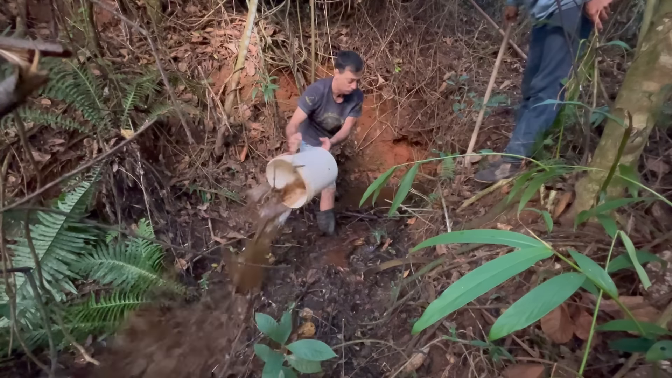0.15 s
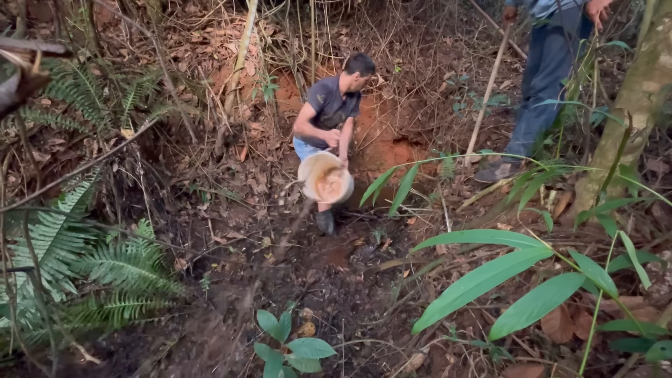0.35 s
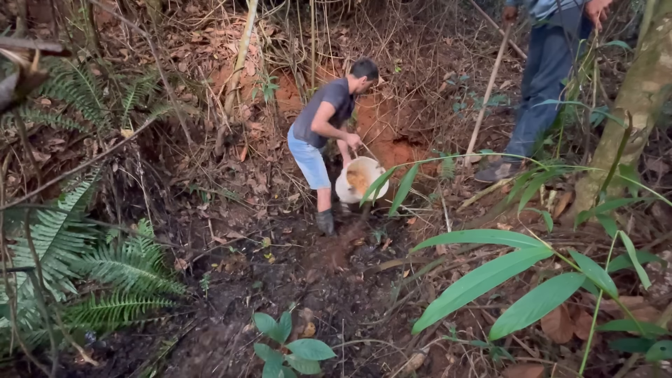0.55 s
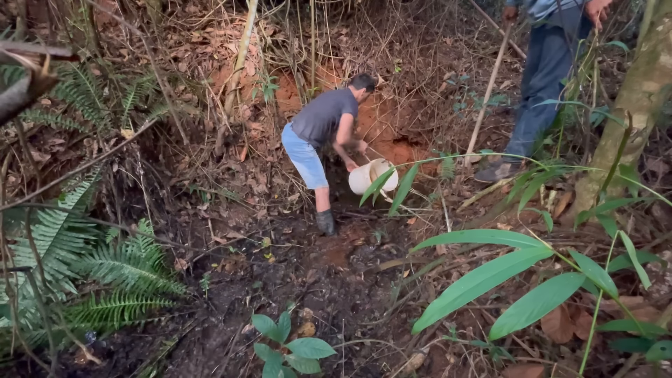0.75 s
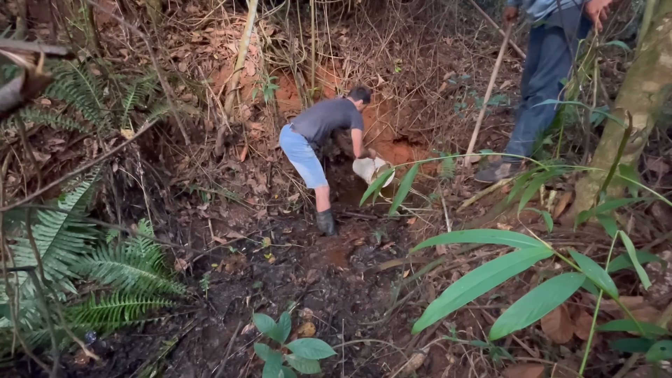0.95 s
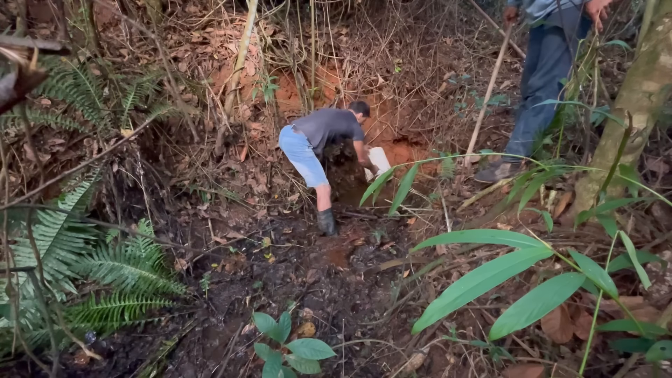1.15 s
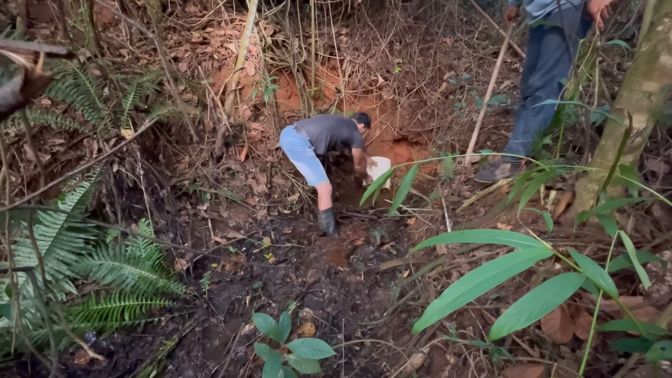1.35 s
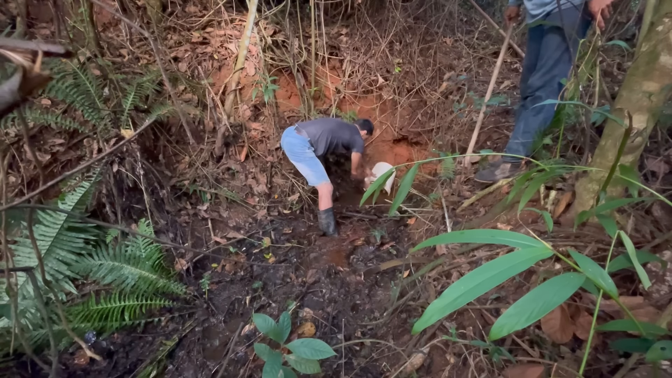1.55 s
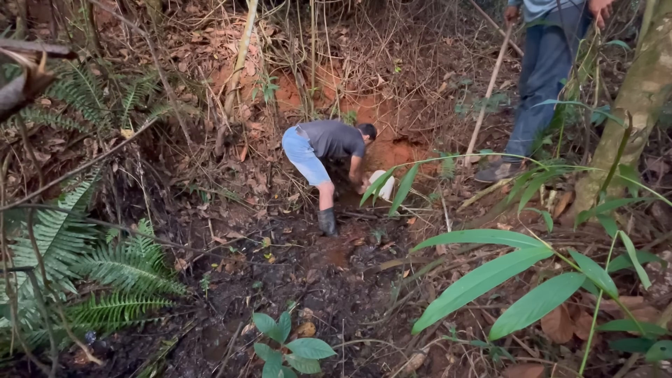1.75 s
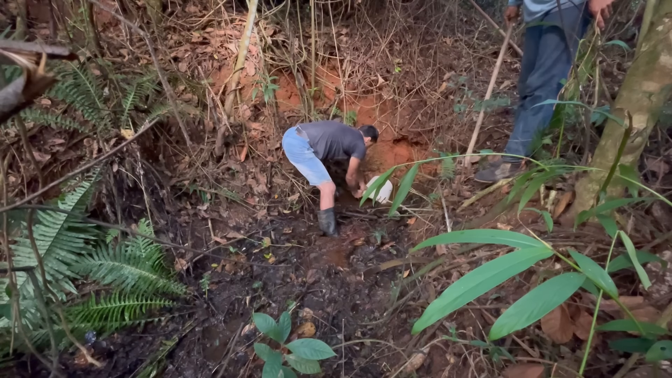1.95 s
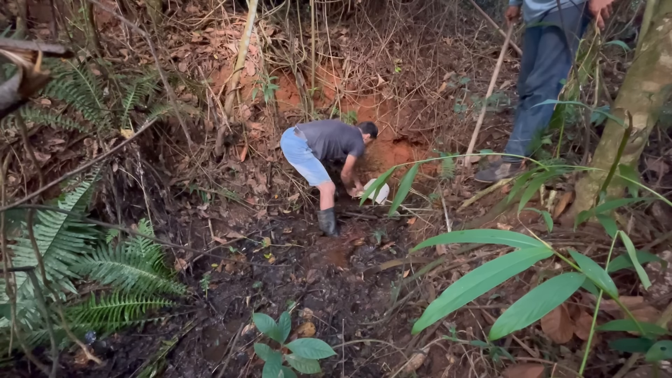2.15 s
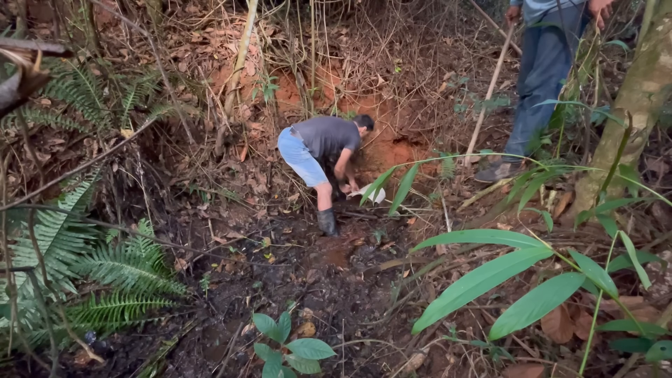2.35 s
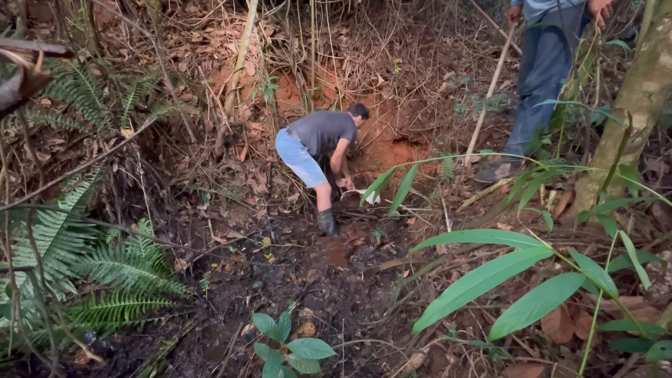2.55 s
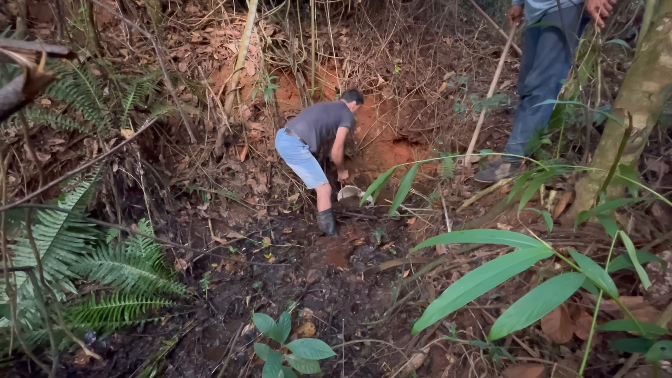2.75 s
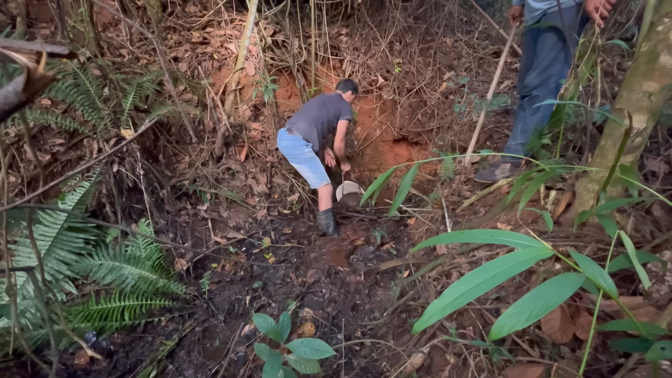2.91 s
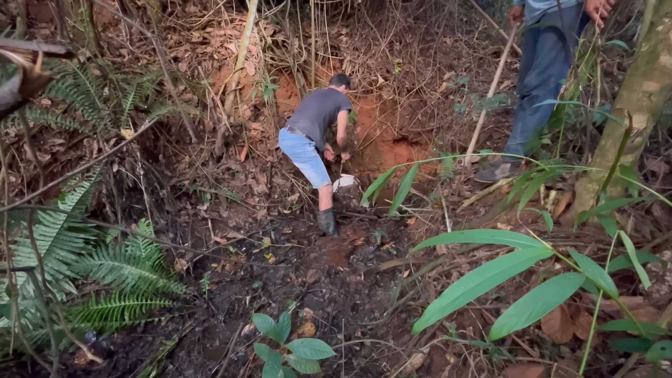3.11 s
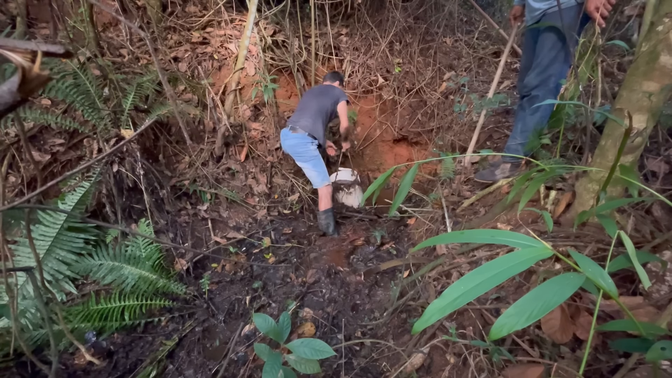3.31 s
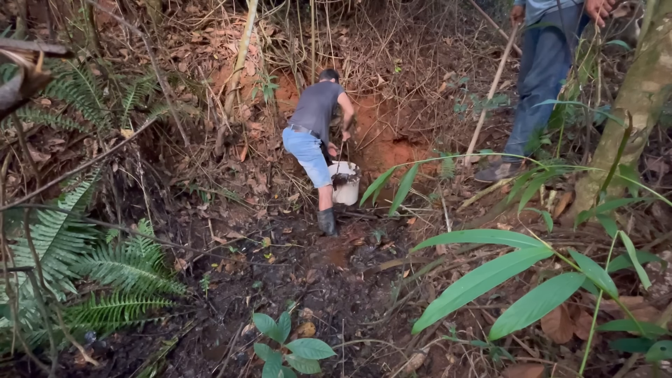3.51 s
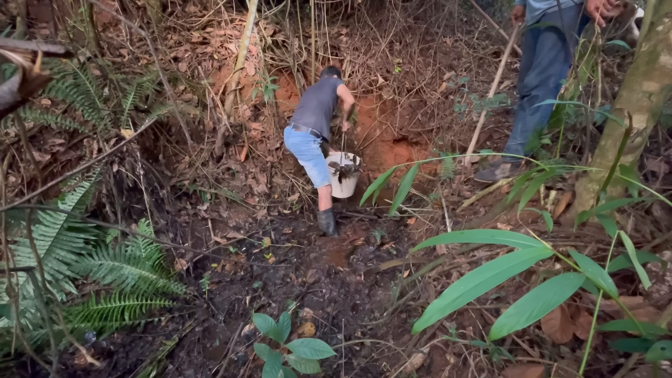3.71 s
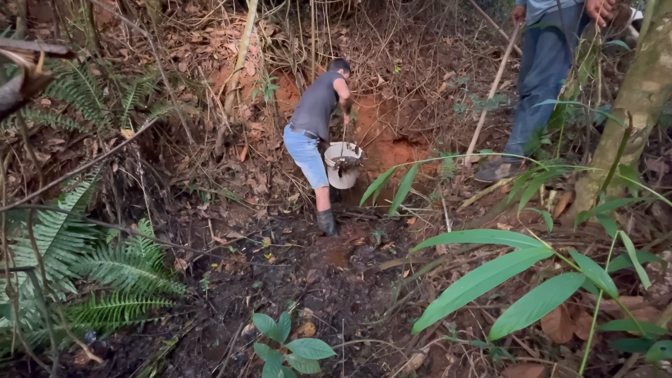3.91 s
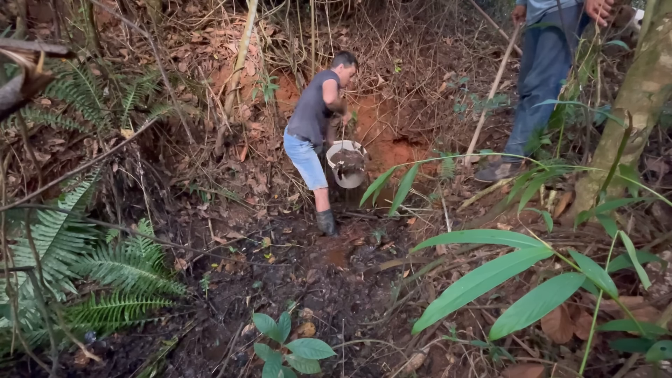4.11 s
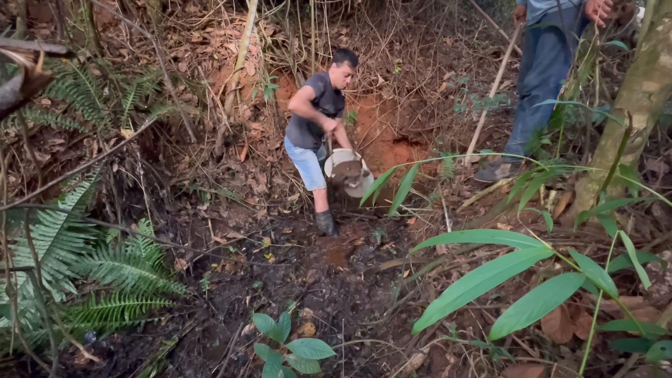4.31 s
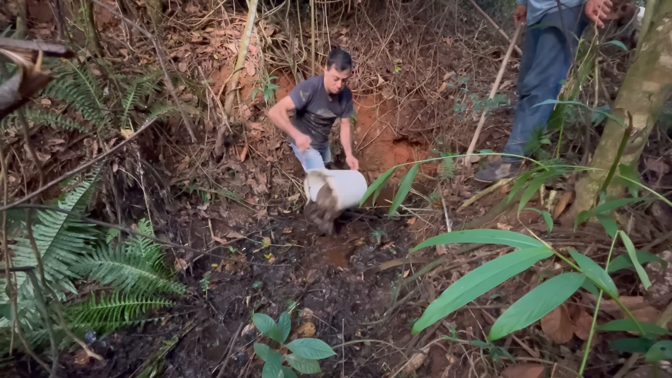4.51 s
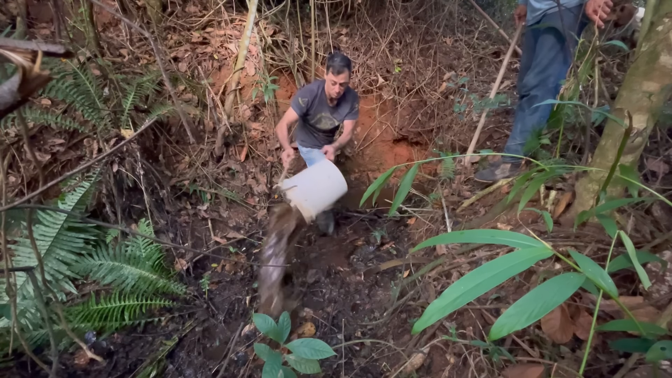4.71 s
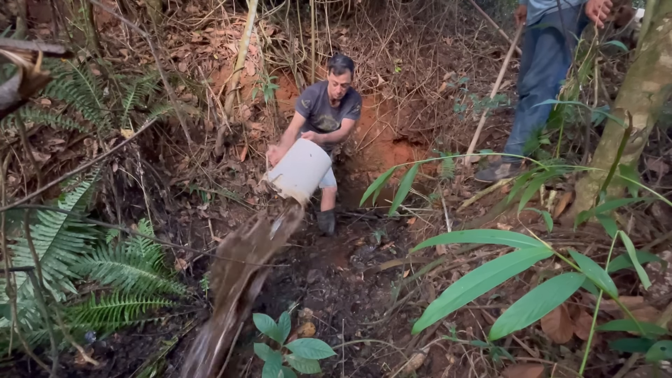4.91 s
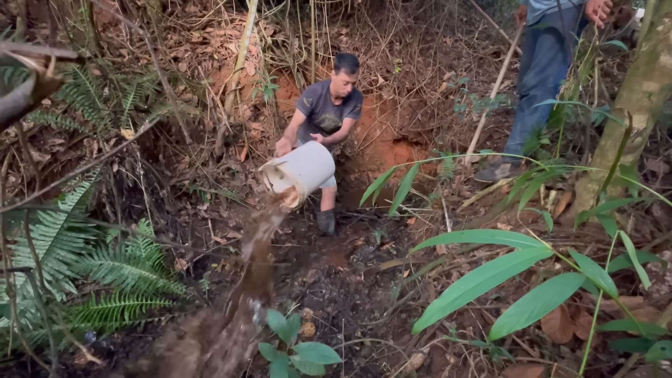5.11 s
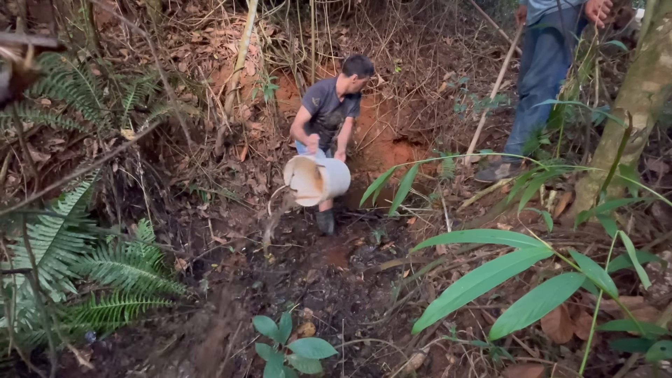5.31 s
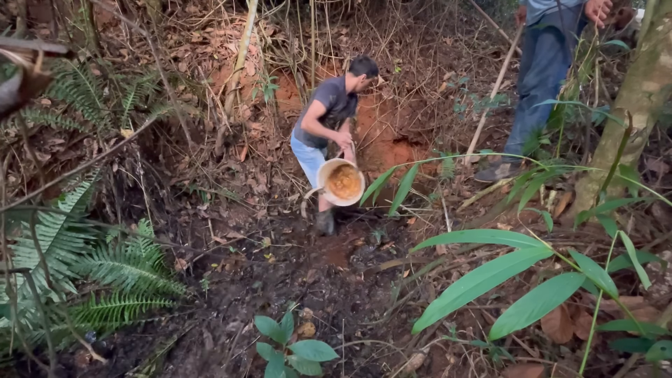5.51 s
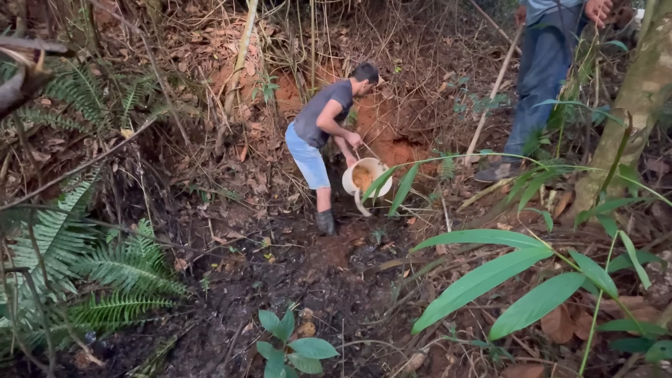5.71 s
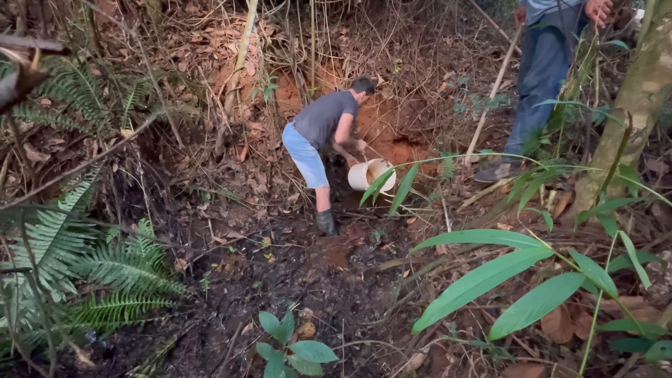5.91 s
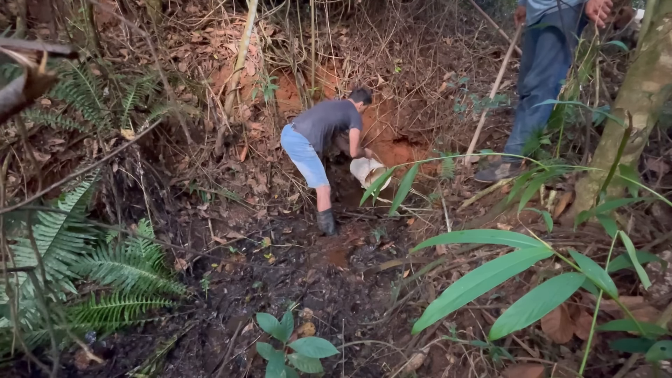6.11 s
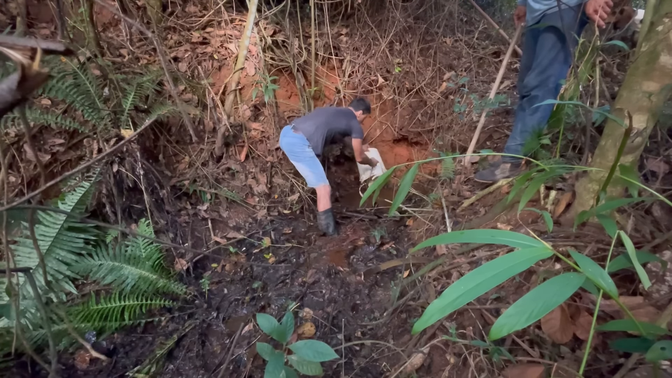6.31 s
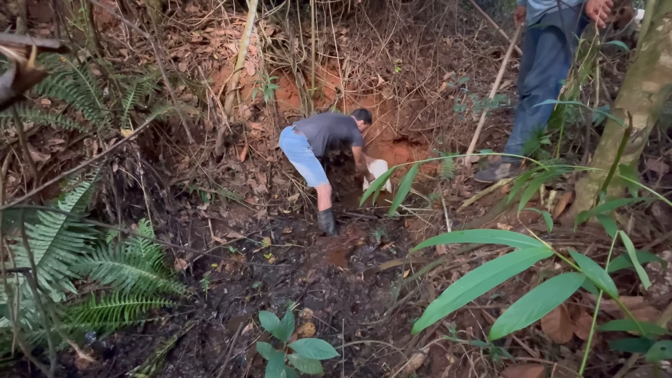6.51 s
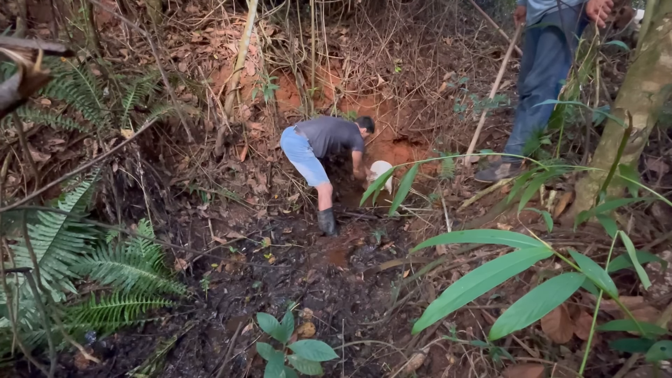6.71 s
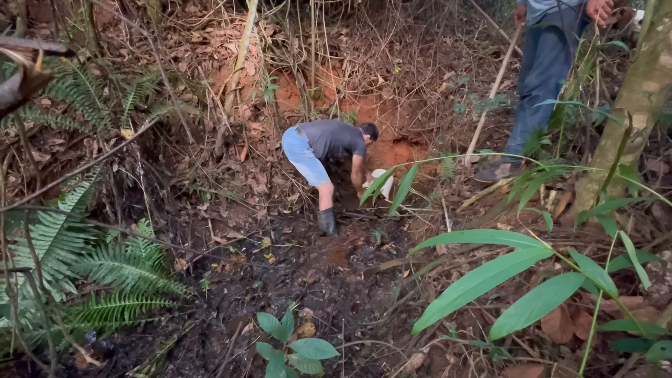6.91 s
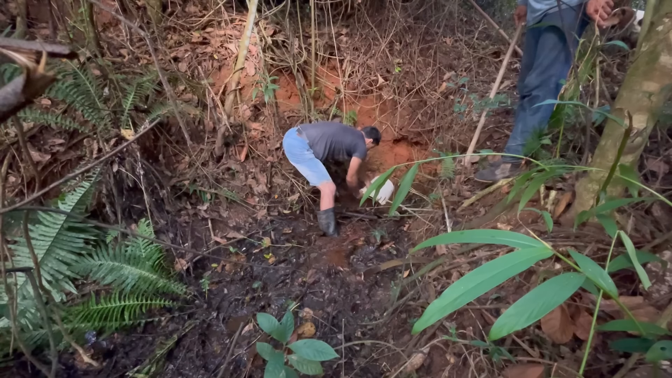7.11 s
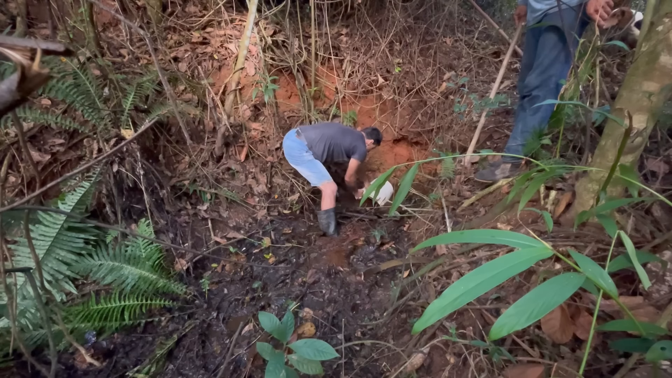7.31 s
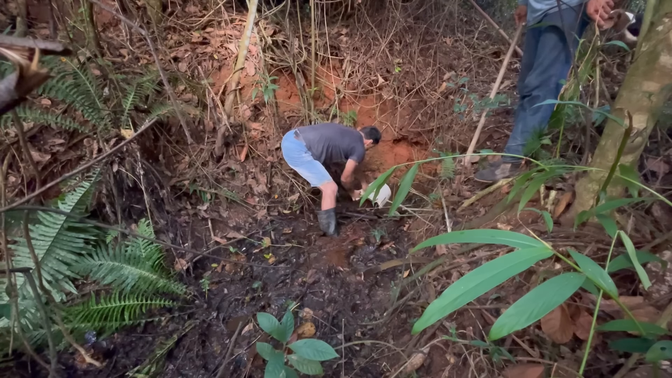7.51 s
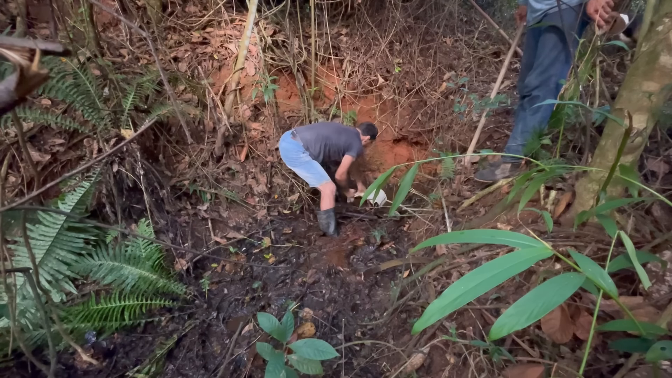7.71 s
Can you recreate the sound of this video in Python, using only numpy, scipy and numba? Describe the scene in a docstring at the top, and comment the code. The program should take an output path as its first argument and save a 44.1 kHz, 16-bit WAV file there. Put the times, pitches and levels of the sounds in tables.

```python
"""A bucketful of muddy water slaps down on wet ground to the left; a second lands some five seconds later.
Each throw layers heavy slaps, a mass of sine bubbles rising in pitch, and widely scattered, pattering spray.
In between, a plastic bucket refills in a hole in the woods a few metres away: resonant modes make its knocks,
bubble clouds its gulps, gushes, sloshes and drips. An insect chirps in gated narrow-band noise, a far engine
drones in wavering harmonics, and filtered noise gives the faint forest air."""
import sys
import numpy as np
from scipy import signal
from scipy.fft import rfft, irfft, next_fast_len
from scipy.io import wavfile
from scipy.ndimage import uniform_filter1d
from numba import njit

SR = 44100
rng = np.random.default_rng(int(sys.argv[2]) if len(sys.argv) > 2 else 0)


def put_to_file(sound):
    """Save the sound as 16-bit audio at rate SR, in the file named by the first command-line argument."""
    columns = np.atleast_2d(sound).T  # one column per channel
    safe = np.clip(columns, -1, 1)
    whole_steps = np.round(safe * 32767)
    wavfile.write(sys.argv[1], SR, whole_steps.astype(np.int16))


N = 341769
TIME = np.arange(N) / SR
SIZE = next_fast_len(N + SR)  # room for filter and echo tails
FREQ = np.arange(SIZE // 2 + 1) * SR / SIZE + 1e-3  # just above zero, so that its log exists
TOP_HZ = 12600

# Thrown bucketfuls: bulk_lands_s, level_db, falling_on_s, thinning_rate (1 = usual)
THROWN_WATER = [(0.013, -1, 0.56, 0.79), (5.025, -1, 0.47, 1.04)]
# Lumps of water hitting the ground: start_s, level_db, trapped_air_pitch_hz
WATER_SLAPS = [(0.002, -9, 720), (0.03, -14.5, 840), (0.036, -15.5, 325), (0.124, -17.5, 820),
               (0.231, -19, 647), (0.258, -23.5, 253), (0.305, -21, 860), (0.363, -24, 840),
               (0.375, -23, 1020), (0.44, -15, 6500), (0.564, -29.5, 172), (0.63, -24, 1920),
               (4.744, -33.5, 1270), (4.786, -37, 1170), (4.823, -47, 926), (4.841, -35, 910),
               (4.846, -15, 5960), (4.865, -31, 1110), (4.893, -31, 483), (4.919, -19, 765),
               (4.969, -19, 690), (5.009, -13, 760), (5.017, -15.5, 233), (5.041, -12.5, 666),
               (5.12, -16.5, 630), (5.164, -17, 820), (5.284, -20, 218), (5.329, -23.5, 890),
               (5.514, -30, 990), (5.591, -40, 918)]
# Spectrum of the splash: frequency_hz, density_db (per Hz)
SPLASH_SPECTRUM = [(30, -10), (60, -25.5), (130, -21), (250, -16.5), (480, -7), (750, -1), (1200, -1.5),
                   (2400, -4), (3700, -6.5), (4400, -7), (5100, -2.5), (6000, -5.5), (8000, -9.5),
                   (10500, 0), (13000, -21)]
# Parts of a splash, each: level_db, rise_power, sag_db_per_s while water falls, release_db_per_s,
# bulk_change_db (negative dips as the bulk lands), dregs_change_db
THUD_SHAPE = (-38.5, 2, 37, 29, -25, 7)
CHURN_SHAPE = (-27.5, 1.33, 19, 44.5, 6, 0.5)
SPRAY_SHAPE = (-31, 0.95, 14, 43.5, 3, 1.5)
# First drops lead the bulk, dregs trail it; each lump lands within LUMP_S
LEAD_S, DREGS_S, LUMP_S = .28, .26, .03
# The front of the sheet lands first: its share of the full flow, and the time it takes to touch down
FRONT_DB, FRONT_S = -12, .035
# Falling water comes in clumps over an even stream: their size and the time in which each dies away
CLUMP_DB, CLUMP_DECAY_S = -7.5, 0.0017
# From the moment the bulk lands, lone drops patter down, fading steadily and outlasting the splash
PATTER_DB, PATTER_DB_PER_S = -35.5, 17.5

# Spectrum of the forest air: frequency_hz, density_db (per Hz)
WOODS_SPECTRUM = [(25, -23), (55, 13.5), (120, -0.5), (250, -3.5), (600, -4.5), (1200, -3), (2200, -7.5),
                  (3300, -5), (6000, -5.5), (8000, -7), (10500, 0.5), (12500, -21.5)]
# Firing rate of the far engine over time: time_s, rate_hz
ENGINE_RATE = [(1.0, 194), (1.55, 202), (1.9, 194), (2.9, 190.5), (3.3, 192), (3.7, 185), (4.2, 203),
               (4.6, 187), (6.0, 195)]
# Engine harmonics: multiple (of the firing rate), level_db
ENGINE_HARMONICS = [(2, -84), (3, -84), (4, -75.5), (5, -84.5), (6, -86.5)]
# Pitch waver as a share of the rate, and how far each harmonic fades
ENGINE_WAVER, ENGINE_FADE_DB = .009, 5.5

# Phrases of even chirping: start_s, end_s, chirps_per_s, level_db
CHIRP_PHRASES = [(0.081, 1.68, 11.3, -49), (1.772, 2.4, 9.6, -56.5), (2.359, 3.6, 10.64, -52.5),
                 (3.676, 4.8, 9.5, -58), (3.854, 7.4, 9.9, -52), (5.662, 6.2, 15, -62),
                 (6.735, 7.06, 9.8, -60), (7.218, 7.75, 9.7, -58.5)]
CHIRP_JITTER_S, CHIRP_SCATTER_DB = 0.0027, 1.2

# Bucket bumping the hole's rim or a leg: start_s, wall_level_db, boom_level_db, crack_level_db,
# pitch_ratio (1 = usual), ring_time_ratio (1 = usual, less when hugged or full)
BUCKET_BUMPS = [(0.888, -69, -40, -58, 1, 1), (0.963, -33, -54, -27, 1, 0.75),
                (1.196, -43, -42, -48, 1.15, 1), (1.351, -36, -57, -54, .8, 0.52),
                (1.559, -37, -56, -24, .9, 0.92), (2.789, -46, -53, -47, 1, 0.6),
                (4.473, -36, -70, -54, 1.05, 0.62), (4.58, -35.5, -69, -49, .95, 0.3),
                (5.81, -36.5, -42, -42, 1, 1), (5.84, -35.5, -47, -39, 1, 0.88),
                (6.073, -37, -38.5, -46, 1, 1), (6.121, -45.5, -39.5, -47, 1, 1),
                (6.384, -46, -39.5, -53, .85, 1), (6.532, -35.5, -51, -52, 1, 1),
                (6.732, -36, -51, -52, 1.05, 1), (6.934, -37, -48, -19, 1, 0.65),
                (7.2, -47, -41.5, -58, .85, 0.76)]
# Resonances of the bucket's air space, before pitch_ratio: frequency_hz, level_db, t60_s
AIR_MODES = [(232, -3.5, 0.15), (350, -17.5, 0.18)]
# Resonances of the bucket's wall, before both ratios: frequency_hz, level_db, t60_s
WALL_MODES = [(420, -1, 0.06), (530, 1, 0.042), (743, 4, 0.032), (950, 2, 0.046), (1144, -5, 0.051),
              (1366, -1, 0.048), (2300, -6, 0.027)]
# The wall gives way under a bump, so its low modes swell slowly
WALL_SWELL_CYCLES = 1
# Mud or cloth cushions a bump: time in which its force builds
BUMP_RISE_S = .0015

# Spectrum of water in the hole: frequency_hz, density_db (per Hz)
SCOOP_SPECTRUM = [(30, -22), (60, -6.5), (110, -9), (220, 2), (400, -3.5), (700, -6), (1200, -5.5),
                  (2000, -3), (3200, -8), (6000, -4), (8000, -6), (10500, 4.5), (13000, -24.5)]
# Air pockets closing in the hole and the bucket, and a faint low squeak (4.25 s):
# start_s, level_db, pitch_hz
HOLE_PLOPS = [(1.198, -43, 1230), (1.557, -43.5, 810), (1.633, -44, 1500), (1.666, -36, 2050),
              (1.775, -48.5, 620), (2.107, -37, 950), (2.338, -45, 552), (2.438, -34.5, 950),
              (2.462, -35.5, 304), (2.472, -41, 488), (2.516, -43, 395), (2.53, -39, 279),
              (2.552, -34.5, 503), (2.556, -40, 268), (2.707, -53, 420), (2.787, -36, 1040),
              (2.788, -39, 3510), (2.972, -40, 2660), (2.995, -42, 1220), (3.157, -42.5, 417),
              (3.208, -51, 460), (3.41, -49.5, 490), (3.57, -55, 1150), (3.812, -54, 1410),
              (3.843, -47, 2880), (4.25, -56, 330), (4.308, -47, 1145), (4.582, -47.5, 415),
              (4.589, -41.5, 960), (5.95, -39.5, 704), (6.071, -41, 866), (6.138, -48, 1490),
              (6.282, -53, 245), (6.315, -48, 1360), (6.644, -47, 422), (6.688, -43, 1090),
              (6.807, -43, 1610), (6.881, -39, 970), (7.078, -50, 1020), (7.114, -43.5, 1670),
              (7.171, -49, 3170), (7.174, -47.5, 445), (7.629, -43, 620), (7.697, -44, 580)]
# Twigs, grit and lone drops: start_s, level_db, pitch_hz
GRIT_TICKS = [(0.8375, -33, 7300), (0.969, -30.5, 8900), (1.267, -30, 10800), (1.6372, -31.5, 8700),
              (2.0306, -36.5, 9000), (2.897, -43, 6600), (3.933, -40, 5670), (4.398, -33.5, 7540),
              (5.877, -29.5, 8250), (6.3704, -35, 9300), (6.4414, -34.5, 7440), (6.494, -32.5, 6960),
              (6.735, -40, 5600), (6.8099, -36, 8300)]
# Spilt water smacking the mud and the pool: start_s, level_db, pitch_hz
MUD_SPLATS = [(1.561, -35, 2490), (1.583, -33.5, 2900), (1.607, -49, 980), (1.612, -34, 1600),
              (1.878, -44.5, 795), (1.989, -44.5, 577), (2.0, -35, 1650), (2.338, -42.5, 3250),
              (2.544, -28.5, 2120), (2.973, -35.5, 2670), (2.997, -35.5, 2000), (3.184, -40, 1680),
              (3.339, -40, 2390), (3.362, -45, 990), (6.442, -40, 1600), (6.492, -50, 1030),
              (6.503, -35, 3280), (6.598, -37, 2650), (6.612, -32, 3120), (6.622, -36, 1620),
              (6.647, -47, 2400), (6.725, -35.5, 1970), (6.882, -46, 2585)]
# Big air pockets glugging out of the sunken bucket: start_s, level_db, pitch_hz
BUCKET_GLUGS = [(1.178, -47, 205), (1.215, -47, 101), (1.478, -40.5, 420), (1.487, -40.5, 171),
                (1.55, -41, 317), (1.659, -43.5, 317), (1.7, -49, 182), (1.828, -43, 171),
                (1.912, -43, 106.4), (2.236, -43, 243), (2.347, -40, 226), (2.708, -46.5, 232),
                (2.792, -41.5, 322.5), (6.504, -54, 264), (6.633, -46, 183), (6.938, -43.5, 310),
                (7.227, -51, 115), (7.433, -45, 156), (7.562, -45.5, 154), (7.632, -37, 234)]
# Trapped air booms lower as the bucket sinks, higher as it fills: time_s, pitch_hz
AIR_PITCH = [(1.15, 220), (1.26, 134), (1.5, 223), (1.92, 122.6), (2.25, 210), (2.5, 330), (3.3, 392),
             (6.1, 236), (6.55, 200), (7.22, 143), (7.55, 183), (7.66, 226)]
# Surges set off by a push or lift: start_s, length_s, level_db, rim_depth (0 in the air, 1 under water)
WATER_SURGES = [(1.177, 0.084, -47.5, 0.66), (1.28, 0.12, -47.5, 0.59), (1.466, 0.17, -44, 0.54),
                (1.68, 0.16, -47, 0.71), (1.83, 0.19, -57, 0.44), (2.0, 0.35, -51, 0.68),
                (2.219, 0.28, -51, 0.91), (2.33, 0.1, -57.5, 0.32), (2.44, 0.17, -45, 0.54),
                (2.66, 0.18, -49, 0.57), (2.89, 0.21, -49, 0.49), (3.148, 0.14, -49.5, 0.43),
                (3.325, 0.023, -50, 0.37), (3.55, 0.45, -72, 0.19), (4.15, 0.45, -60, 0.46),
                (4.599, 0.13, -54.5, 0.41), (6.474, 0.021, -38, 0.56), (6.595, 0.029, -48, 0.82),
                (6.71, 0.086, -49, 0.55), (6.82, 0.24, -49, 0.58), (7.149, 0.19, -54.5, 0.85),
                (7.31, 0.26, -52.5, 0.74), (7.539, 0.11, -49.5, 0.83), (7.62, 0.18, -47.5, 0.71)]
SURGE_ATTACK_S, SURGE_SETTLE_S = .028, 0.095
# What a surge drives: level_db at half depth, depth_gain_db from air to under water
GULP, SLOSH, SPATTER, TRICKLE = (-16.5, 32.7), (-8, -2.9), (-11.5, -28), (-10.5, -52.5)
# A slosh breaks in wavelets: rate per second, size over the even flow, time in which each dies away
WAVELETS, WAVELET_DB, WAVELET_DECAY_S = 38, 0, .014
# Stray drops fall from the bucket and the bank all the while
DRIP_DB = -70
# Water ringing the gap at the rim as the gap changes: start_s, length_s, level_db, first_pitch_hz,
# last_pitch_hz, spread_octaves
RIM_GUSHES = [(1.5, 0.14, -56.5, 585, 1110, 0.19), (2.318, 0.17, -55.5, 1250, 1190, 0.088),
              (2.318, 0.2, -55.5, 523, 450, 0.19), (4.098, 0.19, -71.5, 1170, 1020, 0.14),
              (4.588, 0.18, -61, 854, 1140, 0.34), (6.771, .17, -55, 1530, 2240, 0.3),
              (7.278, .16, -62, 1316, 1480, 0.17), (7.526, 0.16, -61, 1502, 1260, 0.15)]

# Where things are, by name: left_lead_ms, left_minus_right_db
PLACES = {"ground": (.29, 3), "hole": (-.025, -1.5), "undergrowth": (-.05, 3)}
# Balance of the two microphone ports: frequency_hz, left_minus_right_db
STEREO_BALANCE = [(100, 2), (330, 1), (640, 5), (1150, 4), (2100, 2.2), (4200, 7), (6800, 7), (9300, 0)]
# Phase of the treble shared by both ports: frequency_hz, left_lead_rad
TREBLE_TWIST = [(8700, 0), (9750, -3.1), (10400, -3.2), (11800, -6.28)]


def amp(db):
    """Decibels to gain."""
    return 10 ** (np.asarray(db) / 20)


def unit(x):
    """Scale to rms 1."""
    return x / np.sqrt(np.mean(x ** 2))


def shape(x, response):
    """Filter by a frequency response."""
    return irfft(rfft(x, SIZE) * response, SIZE)[..., :N]


def colour(points):
    """Gain curve through frequency_hz, level_db points, straight over log frequency."""
    hz, db = np.transpose(points)
    return amp(np.interp(np.log(FREQ), np.log(hz), db))


def band(x, lo_hz, hi_hz, order=2):
    """Causal band-pass."""
    edges = [lo_hz, min(hi_hz, SR / 2 - 100)]
    return signal.sosfilt(signal.butter(order, edges, "band", fs=SR, output="sos"), x)


def walk(count):
    """Slow random drift with count turns a second; rms 1."""
    step = SR // count
    held = np.repeat(rng.standard_normal(N // step + 1), step)
    return unit(uniform_filter1d(held, step)[:N])


def add(track, s, sound):
    """Mix a sound into a track at time s."""
    i = max(int(s * SR), 0)
    track[i:i + len(sound)] += sound[:N - i]


@njit
def ring(length, start, hz, cycles, size, glide):
    """Bubbles: sines that die by 60 dB within their cycles while the pitch rises by glide."""
    out = np.zeros(length)
    for k in range(len(start)):
        life, first = int(cycles[k] * SR / hz[k]) + 2, int(start[k] * SR)
        turn = 2 * np.pi * hz[k] / SR
        z = size[k] + 0j
        step = np.exp(1j * turn - np.log(1000) / life)
        rise = np.exp(1j * turn * glide / life)
        for i in range(first, min(first + life, length)):
            z *= step
            step *= rise
            out[i] += z.imag
    return out


def bubbles(spectrum, lo_hz, hi_hz, cycles, spread_db, glide, count):
    """A steady cloud of count bubbles a second, many weak and a few strong; rms 1."""
    when, pitch, life, luck = rng.random((count * N // SR, 4)).T
    hz = lo_hz * (hi_hz / lo_hz) ** pitch
    # small bubbles are brief, so they need a higher peak to carry the same power per Hz
    size = hz * amp(-spread_db * np.log(luck + 0.014)) * rng.choice([-1, 1], len(hz))
    cloud = ring(N, when * N / SR, hz, cycles * 3 ** (2 * life - 1), size, float(glide))
    return unit(shape(band(cloud, lo_hz, hi_hz, order=3), colour(spectrum)))


def bursts(table, cycles, glide, rise_s, lasting_s, octaves, shards_db, count):
    """At each event one main bubble swells up, among count smaller ones of scattered pitch."""
    out, t = np.zeros(N), TIME[:SR // 4]
    for s, db, hz in table:
        late = np.r_[0, rng.exponential(1, count)]
        pitch = np.minimum(hz * 2 ** np.r_[0, octaves * rng.standard_normal(count)], TOP_HZ)
        size = np.r_[1, amp(shards_db) * rng.standard_normal(count)] * np.exp(-late / 2)
        life = cycles * np.r_[1, rng.uniform(.2, .8, count)]
        burst = ring(len(t), late * lasting_s, pitch, life, size, float(glide))
        burst = burst * (1 - np.exp(-t / rise_s))
        add(out, s, amp(db) * burst / np.abs(burst).max())
    return out


def clumps(size_db, decay_s, count):
    """Gain of a stream broken into count clumps a second, each landing sharply and fading; rms 1."""
    late, size = rng.random((count * N // SR, 2)).T
    # the stream pinches off at loosely even gaps
    when = (np.arange(len(late)) + late) / len(late)
    power = np.bincount((when * N).astype(int), size ** 2, N)
    power = signal.lfilter([1], [1, -np.exp(-1 / (decay_s * SR))], power)
    return unit(np.sqrt(1 + amp(size_db) ** 2 * power / power.mean()))


def place(x, spot, scatter_db, t60_s, count=5):
    """The direct sound reaches one port first; bank and foliage scatter a tail, alike in the bass only."""
    lead_ms, left_db = PLACES[spot]
    direct_left = amp(left_db / 2) * np.ones(len(FREQ))
    direct_right = amp(-left_db / 2) * np.exp(-2j * np.pi * FREQ * lead_ms / 1000)
    direct = np.array([direct_left, direct_right])
    t, apart = TIME[:SR // 2], FREQ / np.hypot(FREQ, 500)
    # the sound hops between count nearby points, each with its own echoes
    point = np.repeat(rng.integers(0, count, N // 300 + 1), 300)[:N]
    scatter = 0
    for k in range(count):
        share = np.sin(np.pi / 2 * uniform_filter1d(1. * (point == k), size=280))
        tail = rng.standard_normal((2, len(t))) * amp(-60 * t / t60_s) * (t > .002)
        tail = tail / np.sqrt(np.sum(tail ** 2) / 2)
        scatter = scatter + rfft(x * share, SIZE) * rfft(tail, SIZE)
    mid, side = scatter
    scatter = (mid + np.array([[1], [-1]]) * apart * side) / np.sqrt(1 + apart ** 2)
    # leaves and grit scatter the treble most
    scatter = amp(scatter_db) * scatter * (1 + FREQ / 6000)
    return irfft(rfft(x, SIZE) * direct + scatter, SIZE)[:, :N]


def splash(level_db, rise, sag_db_per_s, release_db_per_s, bulk_change_db, dregs_change_db):
    """Gain of one part of a splash: its flow swells up to the bulk, sags while water falls, then dies away."""
    total = 0
    for s, db, falling_s, thinning in THROWN_WATER:
        age = TIME - s
        flow = np.maximum(np.sin(np.pi / 2 * np.clip(1 + age / LEAD_S, 0, 1)), amp(FRONT_DB))
        swell = flow ** rise * np.clip(.5 + (age + LEAD_S) / FRONT_S, 0, 1)
        sag_db = thinning * sag_db_per_s * np.clip(age, 0, falling_s)
        release_db = release_db_per_s * np.maximum(age - falling_s, 0)
        bulk_db = bulk_change_db * np.exp(-(age / LUMP_S) ** 2)
        dregs_db = dregs_change_db * np.exp(-((age - DREGS_S) / LUMP_S) ** 2)
        total = total + swell * amp(db + level_db + bulk_db + dregs_db - sag_db - release_db)
    return total


def patter():
    """Gain of the lone drops: set off as each bulk lands, then fading steadily in dB."""
    total = 0
    for s, db, *_ in THROWN_WATER:
        age = TIME - s
        total = total + (age > 0) * amp(db + PATTER_DB - PATTER_DB_PER_S * age)
    return total


def throws():
    """The mass thuds on the mud, churns into bubbles and breaks up into fine drops that scatter widely."""
    thud = bubbles(SPLASH_SPECTRUM, 55, 340, cycles=9, spread_db=1.9, glide=.15, count=1400)
    churn = bubbles(SPLASH_SPECTRUM, 261.0, 2335, cycles=11.5, spread_db=3.5, glide=0.25, count=2400)
    spray = bubbles(SPLASH_SPECTRUM, 2330, 14300, cycles=2.0, spread_db=3.5, glide=0.31, count=8000)
    lone = bubbles(SPLASH_SPECTRUM, 600, 13000, cycles=9, spread_db=5, glide=.2, count=520)
    slaps = bursts(WATER_SLAPS, cycles=13, glide=.2, rise_s=.0012, lasting_s=.008, octaves=.8,
                   shards_db=-10, count=24)
    landing = clumps(CLUMP_DB, CLUMP_DECAY_S, count=90)
    mass = (thud * splash(*THUD_SHAPE) + churn * splash(*CHURN_SHAPE)) * landing
    mass = mass + band(slaps, 190, 8700)
    drops = spray * splash(*SPRAY_SHAPE) * landing + lone * patter()
    near = place(mass, "ground", scatter_db=-6.5, t60_s=0.29, count=8)
    return near + place(drops, "ground", scatter_db=-1.5, t60_s=0.14, count=12)


def woods():
    """Faint air among the trees: coloured noise, alike at both ports in the bass, drifting gently in level."""
    mid, side = rng.standard_normal((2, N))
    spectrum = colour(WOODS_SPECTRUM)
    width = shape(side, spectrum * FREQ / np.hypot(FREQ, 500))
    air = shape(mid, spectrum) + np.array([[1], [-1]]) * width
    return amp(-60) * unit(air) * amp(.7 * walk(count=3))


def far_engine():
    """Only a few wavering harmonics carry through the trees, each fading in and out on its own."""
    hz = np.interp(TIME, *np.transpose(ENGINE_RATE)) * (1 + ENGINE_WAVER * walk(count=14))
    phase = 2 * np.pi * np.cumsum(hz) / SR
    drone = np.zeros(N)
    for multiple, db in ENGINE_HARMONICS:
        fade = amp(ENGINE_FADE_DB * walk(count=9))
        drone += amp(db) * unit(fade * np.sin(round(multiple) * phase))
    return np.array([drone, drone])


def chirps():
    """Rows of start_s, level_db: an even beat per phrase, each chirp a little off in time and strength."""
    rows = []
    for start_s, end_s, rate, db in CHIRP_PHRASES:
        chance = rng.standard_normal((SR // 1000, 2))
        for s, (late, strong) in zip(np.arange(start_s, end_s, 1 / rate), chance):
            rows.append((s + CHIRP_JITTER_S * late, db + CHIRP_SCATTER_DB * strong))
    return rows


def insect():
    """Each chirp is two wing strokes over a narrow resonance; others of its kind blur into a far chorus."""
    strokes, t = np.zeros(N), np.arange(-SR // 10, SR // 10) / SR
    for s, db in chirps():
        chirp = 0
        for at in (-.016, .016):
            chirp = chirp + np.exp(-((t - at) / 0.0095) ** 2) * amp(0.29 * rng.standard_normal())
        add(strokes, s + t[0], amp(db) * chirp)
    rasp = unit(band(rng.standard_normal(N), 4167, 4385, order=3))
    # the stroke keeps an even force while its pitch wanders
    rasp = unit(band(np.tanh(1.2 * rasp), 4900, 6300))
    near = place(rasp * strokes, "undergrowth", scatter_db=-7.5, t60_s=.22)
    chorus = unit(band(rng.standard_normal((2, N)), 4222, 4640, order=3))
    return near + amp(-56.5) * chorus * amp(0.67 * walk(count=12))


def rung(modes, t, swell_cycles, detune):
    """Modes swell and die away; the load of water detunes them from one bump to the next."""
    total = 0
    for hz, db, t60 in modes:
        envelope = amp(db - 60 * t / t60) * (1 - np.exp(-t * hz / swell_cycles))
        loaded_hz = hz * (1 + detune * rng.standard_normal())
        total = total + envelope * np.sin(2 * np.pi * loaded_hz * t)
    return total


def bucket_knocks():
    """A gritty bump rings the wall briefly, high modes first, and the air for longer; grip and load damp it."""
    out, t = np.zeros(N), TIME[:SR // 3]
    for s, db, boom_db, crack_db, pitch, ringing in BUCKET_BUMPS:
        grit = rng.standard_normal(len(t)) * np.exp(-t / 0.003) * (1 - np.exp(-t / .0007))
        air_modes = [(hz * pitch, mode_db, t60) for hz, mode_db, t60 in AIR_MODES]
        wall_modes = [(hz * pitch, mode_db, t60 * ringing) for hz, mode_db, t60 in WALL_MODES]
        air = rung(air_modes, t, swell_cycles=0.45, detune=0.023)
        wall = rung(wall_modes, t, WALL_SWELL_CYCLES, detune=0.073)
        wall = unit(wall) + amp(-2) * unit(band(grit, 370, 1560))
        wall = wall * (1 - np.exp(-t / BUMP_RISE_S))
        crack = band(grit, 1100, 3400)
        add(out, s, amp(db) * wall / np.abs(wall).max() + amp(boom_db) * air + amp(crack_db) * crack)
    return out


def gulps(cycles, octaves, count):
    """Big air pockets glug in the mouth of the bucket, each near the pitch of its air space; rms 1."""
    when, detune, luck = rng.random((count * N // SR, 3)).T
    start = when * N / SR
    hz = np.interp(start, *np.transpose(AIR_PITCH)) * 2 ** (octaves * (2 * detune - 1))
    sign = rng.choice([-1., 1.], len(hz))
    return unit(band(ring(N, start, hz, cycles * (.5 + luck), sign, 0.16), 53, 630))


def surge(level_db, depth_db):
    """Gain of one kind of water noise: each surge rises, holds and settles; the rim's depth sets the mix."""
    power = 0
    for s, length_s, db, depth in WATER_SURGES:
        age = TIME - s
        settling = np.exp(-np.maximum(age - length_s, 0) / SURGE_SETTLE_S)
        envelope = np.clip(age / SURGE_ATTACK_S, 0, 1) * settling
        power = power + (envelope * amp(db + level_db + depth_db * (depth - .5))) ** 2
    return np.sqrt(power)


def gushes():
    """Water rushing through the gap at the rim: a crowd of bubbles on one sliding pitch, swelling and ebbing."""
    out, count = np.zeros(N), 60
    for s, length_s, db, first_hz, last_hz, octaves in RIM_GUSHES:
        when = rng.random(count)
        detune, size = rng.standard_normal((2, count))
        hz = (first_hz + (last_hz - first_hz) * when) * 2 ** (octaves * detune)
        size = size * np.sin(np.pi * when) ** .5
        crowd = ring(int((length_s + .05) * SR), when * length_s, hz, np.full(count, 20.), size, .2)
        add(out, s, amp(db) * unit(crowd))
    return out


def scooping():
    """Water gulps over the rim, gushes and sloshes in, spatters and trickles back; the bucket bumps the bank."""
    gulp = gulps(cycles=11.4, octaves=0.43, count=110)
    slosh = bubbles(SCOOP_SPECTRUM, 261.0, 1730, cycles=26.5, spread_db=2.5, glide=0.534, count=700)
    spatter = bubbles(SCOOP_SPECTRUM, 1650, 4630, cycles=11, spread_db=4, glide=0.31, count=1100)
    trickle = bubbles(SCOOP_SPECTRUM, 3840, 15500, cycles=1.4, spread_db=3.5, glide=0.14, count=1600)
    drips = bubbles(SCOOP_SPECTRUM, 600, 9000, cycles=14, spread_db=3.3, glide=.2, count=70)
    wavelets = uniform_filter1d(clumps(WAVELET_DB, WAVELET_DECAY_S, count=WAVELETS), size=200)
    breaking = (slosh * surge(*SLOSH) + spatter * surge(*SPATTER)) * wavelets
    water = gulp * surge(*GULP) + breaking + amp(DRIP_DB) * drips + gushes()
    glugs = bursts(BUCKET_GLUGS, cycles=13, glide=.2, rise_s=.006, lasting_s=.008, octaves=.6,
                   shards_db=-14, count=6)
    plops = bursts(HOLE_PLOPS, cycles=26, glide=.2, rise_s=.004, lasting_s=.005, octaves=.6,
                   shards_db=-15, count=10)
    splats = bursts(MUD_SPLATS, cycles=22, glide=.2, rise_s=.004, lasting_s=.005, octaves=.42,
                    shards_db=-6.5, count=10)
    ticks = bursts(GRIT_TICKS, cycles=20, glide=.02, rise_s=.0002, lasting_s=.001, octaves=.24,
                   shards_db=-6, count=12)
    hole = place(water, "hole", scatter_db=-3, t60_s=0.24)
    rim = place(glugs + plops + splats + bucket_knocks(), "hole", scatter_db=-8.5, t60_s=0.2)
    fine = place(trickle * surge(*TRICKLE) + ticks, "hole", scatter_db=-5.0, t60_s=0.05)
    return hole + rim + fine


def scene():
    """Splashes, forest air, a far engine, an insect and bailing."""
    return throws() + woods() + far_engine() + insect() + scooping()


def record(dry):
    """The left port is the louder; the top treble is mostly one phase-twisted signal; rumble and top are cut."""
    left, right = dry
    lean = np.sqrt(colour(STEREO_BALANCE))  # half the balance goes to each port
    shared = np.interp(FREQ, [8000, 9800, 10400, 11200], [0, 1, 1, .92])
    twist = np.exp(-1j * np.interp(FREQ, *np.transpose(TREBLE_TWIST)))
    left_port = shape(left, lean)
    right_port = shape(right, np.sqrt(1 - shared ** 2) / lean) + shape(left, shared * twist / lean)
    ports = np.array([left_port, right_port])
    ports = signal.sosfilt(signal.butter(1, 35, "high", fs=SR, output="sos"), ports)
    return signal.sosfilt(signal.ellip(8, .2, 70, TOP_HZ, fs=SR, output="sos"), ports)


dry = scene()
out = record(dry)
put_to_file(out)
```